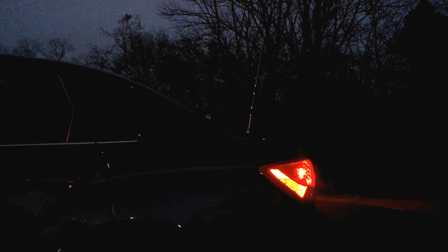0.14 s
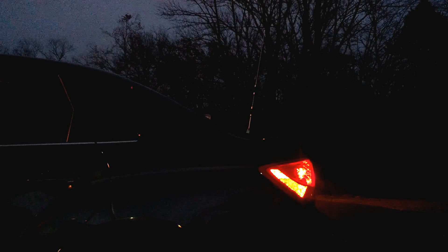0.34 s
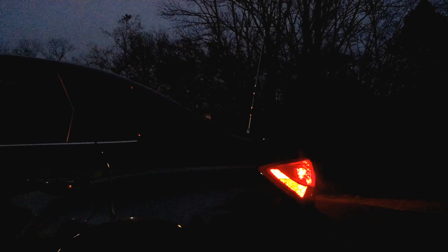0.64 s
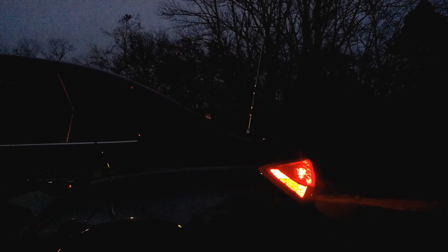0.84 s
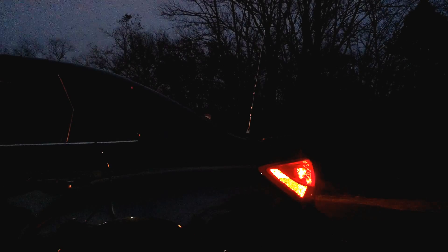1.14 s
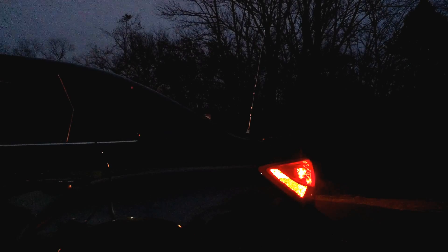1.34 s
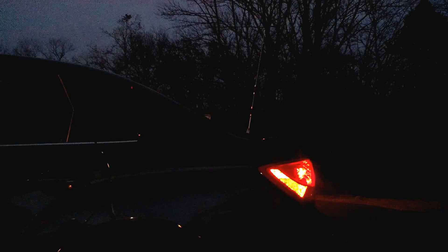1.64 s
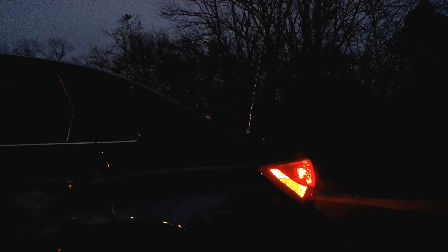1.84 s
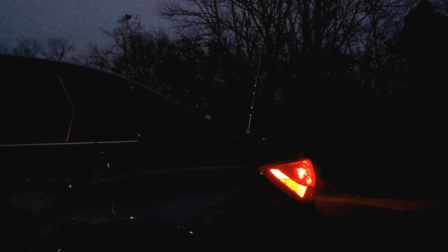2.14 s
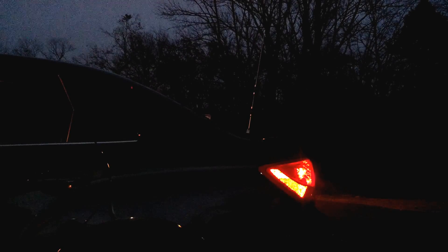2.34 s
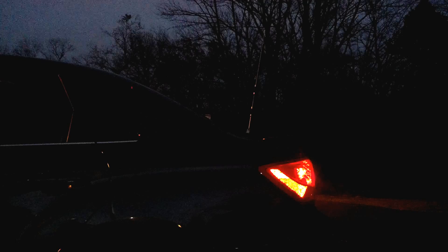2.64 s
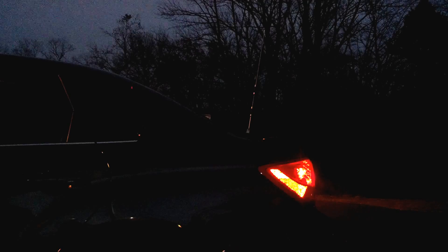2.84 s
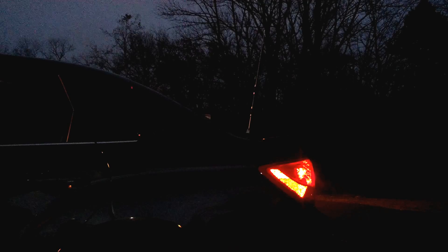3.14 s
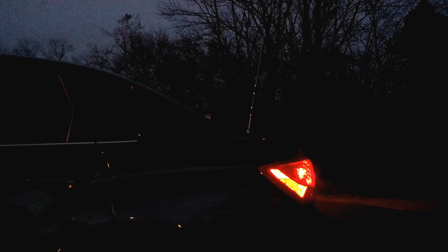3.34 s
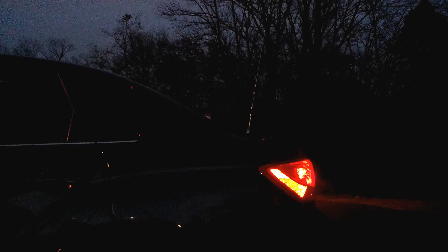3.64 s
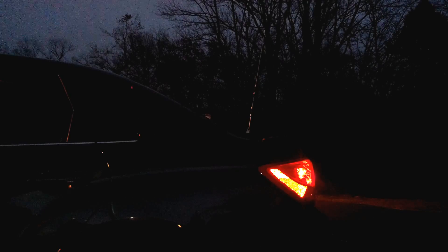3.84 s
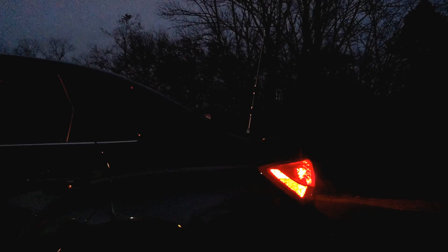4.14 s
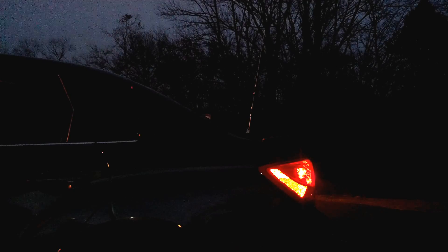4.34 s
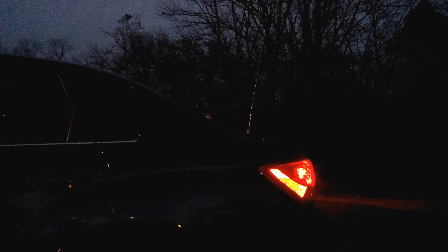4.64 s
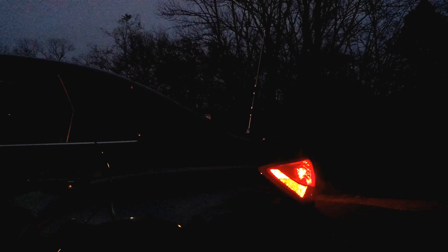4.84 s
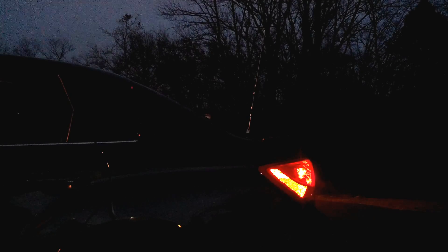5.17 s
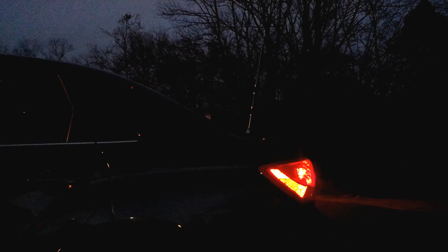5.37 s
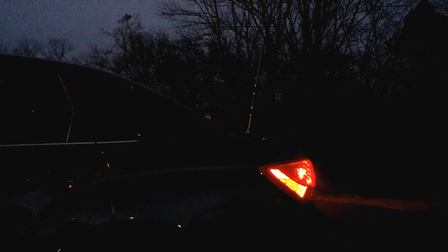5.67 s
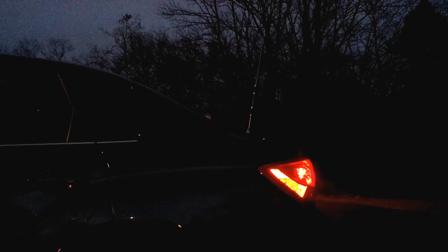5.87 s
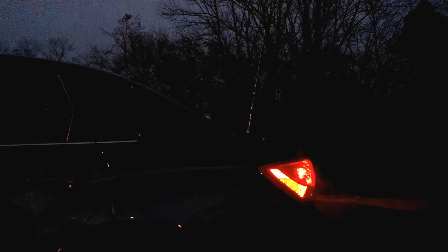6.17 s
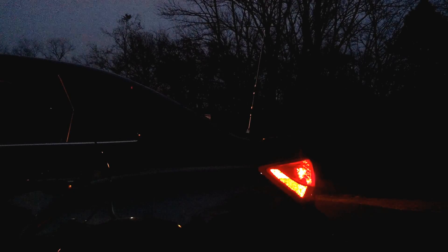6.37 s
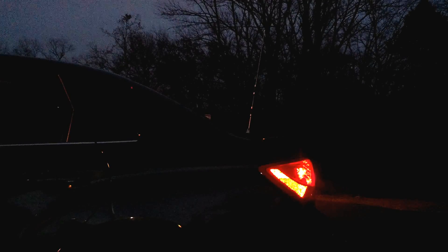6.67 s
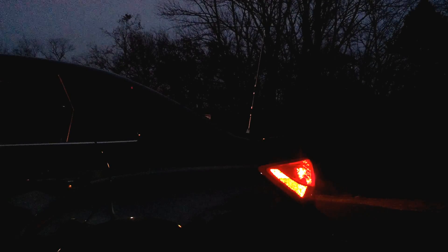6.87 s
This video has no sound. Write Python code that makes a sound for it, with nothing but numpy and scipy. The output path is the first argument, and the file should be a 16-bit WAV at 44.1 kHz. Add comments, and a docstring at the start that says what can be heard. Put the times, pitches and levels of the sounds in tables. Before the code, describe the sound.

A parked car with a flat-four engine and a loud straight exhaust is heard close up outdoors, in stereo. From 0 to 0.9 s it idles with a deep, uneven burble, slowing slightly, with a few light pops and steady airy hiss; a broad rush of air swells just before the first blip. At 1.0 s the throttle snaps open with bright spits and a booming bark, then again at 1.75, 2.2 and 2.5 s, each pushing the pitch higher, with rasp and hard dry cracks around 2.2 and 2.6. From 2.7 s the note falls smoothly, with knocking backfires near 4.0 and 4.15, a faint thin airy whistle around 3.9, and smaller pops until 4.8. Lumpy idle limps on until 5.85 s, when another blip roars up with a brief whistle, sags with pops near 6.65, and a final stab at 6.7 climbs highest, ending abruptly at 7.0. Short, faint yard echoes.

```python
"""A flat-four engine with a straight exhaust idles outdoors, is blipped four times, runs down popping and is blipped twice more.
Each firing sends a pulse and a puff of turbulence through a resonant pipe. Uneven header pipes make the firings
limp, which gives the burble; throttle and speed bring in a rasp of shock fronts, over a note of clean engine orders.
Pops and the loudest firings are dry knocks at the pipe's mouth. Shaped noise makes the air that rushes, hisses and
spits around the engine, with a faint whistle; sparse echoes make the yard. A close pair of microphones gives the stereo image."""
import sys
import numpy as np
from scipy import signal
from scipy.fft import rfft, irfft
from scipy.io import wavfile
from scipy.ndimage import uniform_filter1d

SR = 44100
rng = np.random.default_rng(int(sys.argv[2]) if len(sys.argv) > 2 else 0)


def digitize_waveform(pressure):
    """Quantize a signal to 16-bit integers and store it at the path in sys.argv[1].

    Rows of a 2-D input are taken as channels; values are limited to [-1, 1].
    """
    field = np.atleast_2d(pressure).T
    bounded = np.clip(field, -1, 1)
    quanta = np.round(bounded * 32767).astype(np.int16)
    wavfile.write(sys.argv[1], SR, quanta)


N = 309141
TIME = np.arange(N) / SR

# The cylinders in firing order. Each row: lateness in seconds, level in dB at full limp
# (the boom takes it whole, bark and rasp scale it).
CYLINDERS = [(0.0001, 8.5), (0.0001, 12.5), (0.0003, 17), (0.0003, 4)]
# Overall slope of the exhaust sound. Each row: frequency in Hz, gain in dB.
PIPE_SLOPE = [(30.0, -56), (52.0, -47), (70.0, -13), (100.0, -7.5), (140.0, -0.84), (220.0, -6.5),
              (330.0, -5), (480.0, -11.5), (650.0, -14), (1000.0, -29), (1500.0, -35.5), (2000.0, -41),
              (2600.0, -72), (5000.0, -89)]
# Blips of the throttle. Each row: opening time in seconds, time from opening to release in seconds,
# then boom, bark and rasp level in dB at full load (bark and rasp fall off at low engine speed).
BLIPS = [(1.017, 0.23, -31.5, -26, -29), (1.745, 0.1, -33, -32.5, -28), (2.228, 0.07, -32, -28, -30),
         (2.499, 0.12, -32, -31, -30.5), (5.845, 0.28, -28.5, -26, -30), (6.703, 0.24, -31, -36.5, -25)]
# cycle rates below which the shut-throttle engine is lumpy, and above which it is even
LUMPY_HZ, EVEN_HZ = 15.8, 18.6


def amp(db):
    """Decibels to gain."""
    return 10 ** (np.asarray(db) / 20)


def curve(rows, axis=1):
    """One column of a time table, sample by sample."""
    rows = np.array(rows)
    return np.interp(TIME, rows[:, 0], rows[:, axis])


def read(points, hz, axis=1):
    """One column of a spectrum on a log-frequency axis."""
    points = np.array(points)
    return np.interp(np.log(hz + 1), np.log(points[:, 0]), points[:, axis])


def steady(x, size=4400):
    """Holds the running rms near 1 and keeps the single beats."""
    power = uniform_filter1d(uniform_filter1d(x ** 2, size), size)
    return x / np.sqrt(abs(power) + 1e-20)


def colour(x, db_of, size=8192):
    """Causal (minimum-phase) filter with the gain db_of(Hz)."""
    log_gain = np.log(amp(db_of(abs(np.fft.fftfreq(size, 1 / SR)))))
    ring = np.fft.ifft(np.exp(np.conj(signal.hilbert(log_gain)))).real[:size // 2]
    return signal.oaconvolve(x, ring)[:len(x)]


def band(x, hz, kind, order=4):
    """Butterworth filter."""
    return signal.sosfilt(signal.butter(order, hz, kind, fs=SR, output="sos"), x)


def add(mix, s, sound):
    """Mixes a sound in at time s."""
    part = mix[max(round(s * SR), 0):][:len(sound)]
    part += sound[:len(part)]


def bursts(rows):
    """Gain of soft-edged bursts given as (start s, length s, dB)."""
    gain = np.zeros(N)
    for s, length, db in rows:
        add(gain, s, amp(db) * signal.windows.tukey(int(length * SR), .5))
    return gain


def blend(a, b, share):
    """Mixes two sounds, giving the first its share of the power."""
    share = np.clip(share, 0, 1)
    return np.sqrt(share) * a + np.sqrt(1 - share) * b


def hump(hz, centre, width, db):
    """Lift of one resonance in dB."""
    return db / (1 + (2 * (hz - centre) / width) ** 2)


def yard(x, size=16384):
    """Sparse echoes from the ground, the car and the trees, other ones for each side; treble dies sooner."""
    # Each row: frequency in Hz, time to fall by 60 dB in seconds.
    decay_times = [(100, 1), (500, 0.34), (1200, 0.15), (8000, 0.0053)]
    density = 2000  # reflections per second
    kept = (rng.choice([-1., 1.], (2, size)), rng.random((2, size)) < density / SR)
    taps = kept[0] * kept[1] * (TIME[:size] > .004)
    hz, t, spectrum = signal.stft(taps, SR, nperseg=256)
    fade = amp(-60 * t / read(decay_times, hz)[:, None])
    tail = signal.istft(spectrum * fade, SR)[1]
    return signal.fftconvolve(x[None], tail / np.linalg.norm(tail[0]), axes=1)[:, :N]


def whistle(centre_hz=4245, waver_hz=28):
    """A thin tone in the air flow whose pitch wavers slightly with slow noise."""
    # Each row: start in seconds, length in seconds, rms level in dB.
    whistles = [(3.86, 0.27, -68), (6.01, 0.16, -65)]
    hz = centre_hz + waver_hz * steady(band(rng.standard_normal(N), 45, "low"))
    return np.sqrt(2) * bursts(whistles) * np.sin(2 * np.pi * np.cumsum(hz) / SR)


def hiss_of_air(speed, white, throb=0.11):
    """Hiss around the engine: coloured noise that throbs with the firings and swells in gulps."""
    # Each row: time in seconds, level in dB before the 5 dB lift below.
    hiss_level = [(0, -60), (.84, -58.5), (1.14, -66), (1.21, -61.5), (1.64, -56.5), (1.8, -58.5),
                  (2.02, -56), (2.38, -57.5), (2.75, -53.5), (3.4, -56.5), (3.96, -58), (4.26, -64),
                  (5.8, -56), (6.21, -62), (7.01, -54)]
    # Each row: frequency in Hz, gain in dB.
    hiss_colour = [(30, -3.5), (200, 28), (600, 18), (1000, 15), (1600, 6.5), (2200, 7.5), (2900, 5),
                   (3900, -2), (6000, -5.5), (9500, -9.5), (12500, -16), (15700, -9.5)]
    # Gulps of intake air as the throttle moves.
    # Each row: start in seconds, length in seconds, level in dB before the same lift.
    gulps = [(.85, 0.14, -55.5), (1.005, 0.18, -61), (1.66, 0.13, -60.5), (5.78, 0.12, -64.5)]
    beat = 1 + throb * np.cos(2 * np.pi * len(CYLINDERS) * np.cumsum(speed) / SR)
    hiss = np.array([colour(w, lambda hz: read(hiss_colour, hz)) for w in white])
    level = (amp(curve(hiss_level)) + bursts(gulps)) * amp(5)
    return hiss * level * beat / band(hiss, 3000, "high").std()  # levelled by its treble


def spits_of_air(white, attack=0.00043, decay=0.015, size=4000):
    """Spits as the throttle snaps open: bright noise with a sharp attack and a short decay (s)."""
    # Each row: start in seconds, level in dB before filtering and the 4 dB lift below.
    spit_times = [(0.9496, -40.5), (1.0151, -44.5), (1.0695, -46.5), (1.1508, -50), (1.748, -43.5),
                  (2.235, -49), (5.87, -42.5), (5.987, -48.5), (6.705, -48.5)]
    envelope = np.zeros(N)
    t = TIME[:size]
    for s, db in spit_times:
        add(envelope, s, amp(db) * np.exp(-t / decay) * (1 - np.exp(-t / attack)))
    return band(white, [2500, 13500], "band", order=2) * envelope * amp(4)


def rush_of_air(white, peak_s=0.93, peak_db=-37, rise=13.5, fall=42):
    """A broad rush swells up to the first blip and dies away; rise and fall are in dB a second."""
    # Each row: frequency in Hz, gain in dB.
    rush_colour = [(200, -33), (550, -13.5), (780, -5), (1000, -2.5), (1300, -11.5), (1750, -15),
                   (2300, -25), (3200, -30.5), (6000, -46)]
    rush = np.array([steady(colour(w, lambda hz: read(rush_colour, hz))) for w in white])
    since = TIME - peak_s
    rush_db = peak_db + np.minimum(rise * since, -fall * since)
    # peak_db is the level of the part common to both sides; each side's own part is 1.98 times as strong
    return amp(rush_db) * (rush[2] + 1.98 * rush[:2])


def air(speed):
    """Hiss, spits and rush of turbulent air, with separate noise at each microphone."""
    white = rng.standard_normal((7, N))
    return hiss_of_air(speed, white[:2]) + spits_of_air(white[2:4]) + rush_of_air(white[4:])


def pipe_db(hz, ring=1):
    """Gain of the exhaust pipe: standing waves on a falling slope."""
    # Standing waves. Each row: frequency in Hz, width in Hz, lift in dB at full ring.
    pipe_modes = [(125.1, 73, 11), (176.9, 25, 9.5), (214, 14.7, 7), (279, 23, 5), (340, 39, -15),
                  (404, 130, 6), (480.8, 27.3, 9.5), (551, 44, 8), (860, 36, 9.5), (1055, 62, 7.5),
                  (1426, 110, 16.5)]
    return read(PIPE_SLOPE, hz) + ring * sum(hump(hz, *mode) for mode in pipe_modes)


def pops(decay=0.006, turbulence=0.045, bounce=0.0044, bounce_db=-6, size=6000):
    """Each pop or loud firing is a dry knock at the pipe's mouth: a shock, its bounce and a short roar."""
    # Pops of unburnt fuel, and single loud firings that crack out under throttle.
    # Each row: start in seconds, peak in dB (played 6 dB lower),
    # treble crack in dB (15.5 dB is added to give the lift of the treble).
    pop_times = [(0.0056, -14.5, -26), (0.195, -23, -13), (0.3033, -20, 1), (0.4129, -18, -18),
                 (1.753, -11, 1.5), (2.164, -4.5, -21), (2.1749, -8.5, -15.5), (2.185, -7.5, -19),
                 (2.236, -3.5, -4.5), (2.258, -9.5, -1.5), (2.268, -11.5, 3), (2.546, -11.5, -18.5),
                 (2.582, -12, 6), (2.616, -9, -13), (3.963, -5, -17.5), (3.9703, -13.5, -30),
                 (4.054, -17.5, -18), (4.157, -1.5, -2), (4.174, -18.5, -12), (4.3226, -13, -25),
                 (4.3375, -15.5, -11), (4.429, -23.5, -21), (4.469, -28, -25), (4.5027, -19, -31),
                 (4.5586, -19, -38), (4.6623, -18, -28), (4.8305, -16.5, -48), (6.622, -11, -38),
                 (6.649, -13.5, -9), (6.661, -14, -6), (6.678, -23, -31), (6.708, -6, -21), (6.786, -10, 3),
                 (6.862, -26.5, -6)]
    mouth = 466, 245, 8  # hollow knock of the pipe's mouth: Hz, width Hz, lift dB
    ring = 0.65  # share of the standing waves that a knock sets ringing
    out, t = np.zeros(N), TIME[:size]
    for s, db, crack_db in pop_times:
        roar = turbulence * np.exp(-t / decay) * rng.standard_normal(size)
        shock = (t == 0) + roar
        add(shock, bounce, amp([bounce_db]))
        knock = colour(shock, lambda hz: pipe_db(hz, ring) + hump(hz, *mouth))
        knock = band(knock, 273, "high", order=2)
        pop = colour(knock, lambda hz: (crack_db + 15.5) / (1 + (700 / (hz + 1)) ** 4))
        pop = band(pop, 2100, "low", order=4)
        add(out, s, amp(db - 6.0) * pop / abs(pop).max())
    return out


def blip_envelopes(attack=0.022, release=0.047):
    """Load of each blip: attack, hold, release (s), as the exhaust answers the throttle."""
    rows = np.array(BLIPS)
    t, held = TIME - rows[:, :1], rows[:, 1:2]
    return np.clip(t / attack, 0, 1) * np.exp(-np.maximum(t - held, 0) / release)


def unevenness(speed, load, idle=.43, loaded=.27, coast=.14):
    """Roughness of combustion (0-1): lumpy at idle, firmer under load, least when coasting at speed."""
    shut = np.interp(speed, [LUMPY_HZ, EVEN_HZ], [idle, coast])
    return shut + (loaded - shut) * np.minimum(load, 1)


def clean_share(speed, load, coast=.82, loaded=.5):
    """Clean-note share of the boom's power: even combustion melts the beats into a note as speed gathers."""
    shut = coast * np.interp(speed, [LUMPY_HZ, EVEN_HZ], [0, 1])
    opened = loaded * np.minimum(speed / EVEN_HZ, 1) ** 2
    return np.clip(shut * (1 - load) + load * opened, 0, 1)


def drone(speed, load, size=1024):
    """Clean engine orders through the pipe, phased around the first two firings in each cycle."""
    # The engine note before the pipe. Each row: multiple of the cycle rate,
    # relative level in dB when coasting, relative level in dB under load.
    orders = [(3, -3.2, -13.1), (4, 9.3, -0.6), (5, 2.1, -3.1), (7, 4.0, -2.4), (8, -0.5, 2.9),
              (9, -0.6, -3.4), (11, -0.0, -1.3), (12, -2.2, 3.9), (13, -1.8, 0.1), (15, 0.1, -0.3),
              (16, 0.5, 0.9), (17, -1.2, 2.9), (19, 4.3, 3.3), (20, -5.5, 0.1), (21, -1.6, 4.3),
              (23, 4.8, 0.4), (24, -1.1, -2.5), (25, -0.5, 4.8), (27, 2.6, -0.2), (28, 0.2, -1.3),
              (29, -2.6, 2.7), (31, -1.3, -1.6), (32, -2.9, 1.3), (33, -2.9, 2.3)]
    turns = (np.cumsum(speed) / SR - 3 / 8) % 1  # zero lies midway between those two firings
    k, coast_db, load_db = np.array(orders).T
    cycle = np.linspace(0, 1, size)
    waves = np.sign(np.cos(np.pi * k / 4)) * np.cos(2 * np.pi * np.outer(cycle, k))
    coasting = np.interp(turns, cycle, waves @ amp(coast_db))
    loaded = np.interp(turns, cycle, waves @ amp(load_db))
    return colour((1 - load) * coasting + load * loaded, pipe_db)


def firings(speed, roughness):
    """Time, cylinder row and roughness of every exhaust stroke, four strokes to a cycle."""
    at = np.flatnonzero(np.diff(np.floor(np.cumsum(speed) * len(CYLINDERS) / SR)))
    cylinder = np.arange(len(at)) % len(CYLINDERS)
    return TIME[at], np.array(CYLINDERS)[cylinder], roughness[at]


def puffs(times, sizes, rough, turbulence, decay):
    """A pressure pulse for each firing, trailed by a dying puff of turbulence."""
    train = np.zeros(N)
    train[np.clip(np.round(times * SR).astype(int), 0, N - 1)] = sizes
    trail = np.exp(-TIME[:4096] / decay)
    eddies = signal.oaconvolve(train, trail / np.linalg.norm(trail))[:N] * rng.standard_normal(N)
    return train + turbulence * rough * eddies


def exhaust(speed, limp_hz=24, boom_scatter_db=5, bark_scatter_db=6, rasp_scatter_db=8):
    """Firings ring the pipe: a round boom, a bark from the pulse front and a rasp under throttle."""
    # Exhaust with the throttle shut. Each row: time in seconds, boom level in dB, bark level in dB.
    overrun = [(0, -34, -43.5), (.75, -39, -45), (1.03, -28, -45), (1.45, -35, -40.5), (1.6, -28.5, -36.5),
               (2.05, -28.5, -30), (2.43, -32.5, -36.5), (2.85, -27, -26.5), (3.25, -26, -30.5),
               (3.58, -29.5, -33.5), (3.94, -27.5, -32.5), (4.03, -34.5, -37), (4.45, -34, -48),
               (5.0, -41, -50), (5.75, -34.5, -48), (5.86, -31, -64), (6.3, -38, -38.5), (6.55, -28, -35.5),
               (7.01, -33.5, -23)]
    # Tilt of the shock fronts against the pipe's slope. Each row: frequency in Hz, gain in dB.
    shock_colour = [(80, -12), (250, -0.5), (450, -0.5), (800, 4.5), (1400, 10), (2000, 10)]
    bark_clean = .62  # the bark's clean share relative to the boom's
    even_out = 0.44  # share of the cylinders' imbalance that an open throttle evens out
    crack_hz = 29.4  # cycle rate from which the shock fronts are fully sharp
    steep_hz, steep_power = 21.3, 1.9  # blip bark and rasp grow with speed by this power up to steep_hz

    loads = blip_envelopes()
    load = np.minimum(loads.sum(0), 1)
    roughness = unevenness(speed, loads.sum(0))
    times, cylinder, rough = firings(speed, roughness)
    delay, bank_db = cylinder.T
    # the limp grows with speed and lessens under load
    limp = np.minimum(speed / limp_hz, 1) ** 2 * (1 - even_out * load)
    bank_db = bank_db * np.interp(times, TIME, limp)
    late, strong, sharp = rng.standard_normal((1000, 3))[:len(times)].T * rough
    times = times + delay + .0004 * late

    # the long header turns its bass over
    sign = np.where(np.arange(len(times)) % len(CYLINDERS) < 2, 1, -1)
    boom_sizes = sign * amp(bank_db + boom_scatter_db * strong)
    bark_sizes = amp(1.1 * bank_db + bark_scatter_db * (strong + sharp) / 2)
    rasp_sizes = amp(0.39 * bank_db + rasp_scatter_db * sharp)
    boom = colour(puffs(times, boom_sizes, roughness, turbulence=.8, decay=.008), pipe_db)
    bark = colour(puffs(times, bark_sizes, roughness, turbulence=1.2, decay=.004), pipe_db)
    # under throttle the front is a shock that leaves the pipe at once, without ringing
    shocks = puffs(times, rasp_sizes, roughness, turbulence=1., decay=.002)
    rasp = colour(shocks, lambda hz: read(PIPE_SLOPE, hz) + read(shock_colour, hz))
    crack = np.minimum(speed / crack_hz, 1) ** 2
    rasp = steady(crack * rasp + (1 - crack) * band(rasp, 590, "low", order=1))

    smooth = clean_share(speed, load)
    note = steady(drone(speed, load))
    boom = blend(note, steady(boom), smooth)
    boom = steady(band(boom, 306, "low", order=8))
    bark = blend(note, steady(bark), bark_clean * smooth)
    bark = band(bark, 289, "high", order=4)
    bark = steady(band(bark, 770, "low", order=1))

    # a blip booms at once; its bark and rasp grow as the engine picks up
    boom_gain, bark_gain, rasp_gain = amp(np.array(BLIPS)[:, -3:]).T @ loads
    steep = np.minimum(speed / steep_hz, 1) ** steep_power
    boom_gain = amp(curve(overrun)) + boom_gain
    bark_gain = amp(curve(overrun, axis=2)) + steep * bark_gain
    return boom_gain * boom + bark_gain * bark + steep * rasp_gain * rasp


def place(tailpipe):
    """Sets the tailpipe between the microphones by level and phase at each pitch, keeping its mid level."""
    # Each row: frequency in Hz, left over right in dB, lead of the left in radians.
    leans = [(59.6, -16, -3.2), (114, -3.2, -1.58), (196, -3.5, 0.63), (277, 5.5, -0.23), (420, 3.5, -0.23),
             (600, 2.5, .8), (1000, 3, 0.54), (1400, 5, 0.28), (2000, 30, 1)]
    hz = np.fft.rfftfreq(N, 1 / SR)
    lean = amp(read(leans, hz) / 2) * np.exp(.5j * read(leans, hz, axis=2))  # half to each side
    sides = np.array([lean, 1 / lean]) / abs((lean + 1 / lean) / 2)
    return irfft(rfft(tailpipe) * sides, N)


def scene():
    """The tailpipe placed between the microphones, its echoes and the air noise."""
    # Engine speed. Each row: time in seconds, four-stroke cycles a second in Hz (four firings each).
    speed_course = [(0.0, 10.63), (0.6, 8.93), (1.01, 9.2), (1.1, 13.4), (1.2, 16.6), (1.3, 20.0),
                    (1.41, 21.3), (1.6, 19.6), (1.74, 19.3), (1.8, 21.1), (1.9, 25.0), (1.95, 25.6),
                    (2.1, 24.1), (2.22, 23.1), (2.3, 27.0), (2.36, 28.6), (2.5, 27.7), (2.6, 29.7),
                    (2.69, 31.8), (2.8, 30.7), (3.3, 24.7), (3.9, 18.2), (4.3, 15.0), (5.0, 10.7),
                    (5.85, 9.6), (6.0, 14.6), (6.15, 20.9), (6.28, 23.8), (6.4, 22.4), (6.6, 20.6),
                    (6.7, 20.6), (6.8, 25.3), (6.9, 31.4), (6.95, 34.4), (7.01, 36.5)]
    speed = curve(speed_course)
    tailpipe = -(exhaust(speed) + pops())
    direct = place(tailpipe)
    echoes = yard(band(tailpipe, 187, "high", order=1))  # long waves pass the trees unscattered
    return direct + amp(-15) * echoes + air(speed) + whistle()


def record(dry, notch_hz=2756, edge_hz=15780, leak=0.017):
    """Subtracting the delayed microphones combs the middle and the sides in turn; then the band limit."""
    hz = np.fft.rfftfreq(N, 1 / SR)
    turn = np.pi * hz / notch_hz
    # the leak keeps the notches from reaching silence; the middle is left whole below half the notch
    mid_comb = np.where(hz > notch_hz / 2, np.hypot(np.sin(turn), leak), 1)
    side_comb = np.hypot(np.cos(turn), leak)
    mid = rfft(dry[0] + dry[1]) / 2 * mid_comb
    side = rfft(dry[0] - dry[1]) / 2 * side_comb
    pair = irfft(np.array([mid + side, mid - side]), N)
    low_pass = signal.firwin(1023, edge_hz, window=("kaiser", 9), fs=SR)
    return signal.oaconvolve(pair, low_pass[None], "same")


dry = scene()
out = record(dry)
digitize_waveform(out)
```